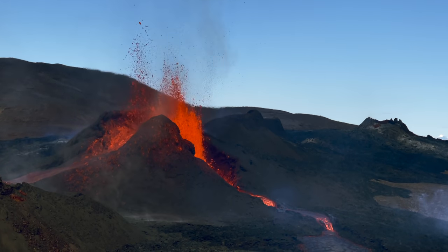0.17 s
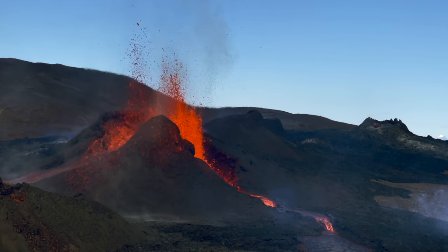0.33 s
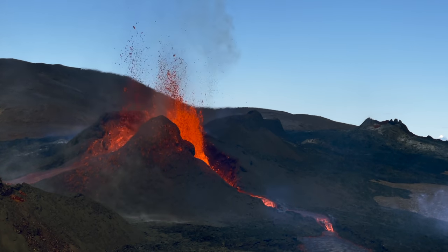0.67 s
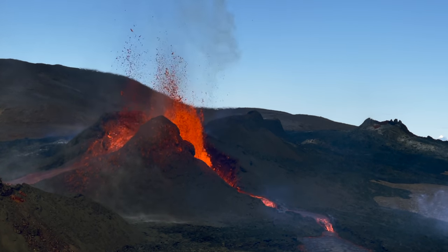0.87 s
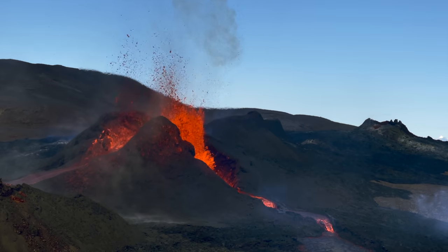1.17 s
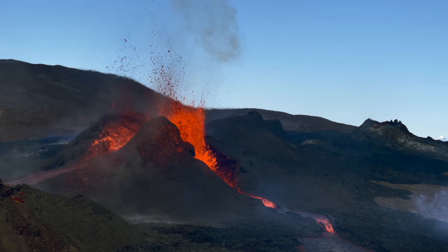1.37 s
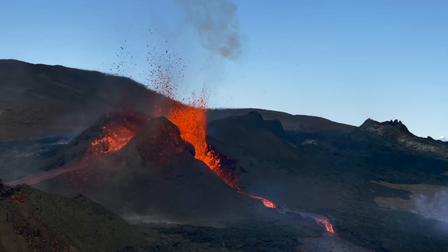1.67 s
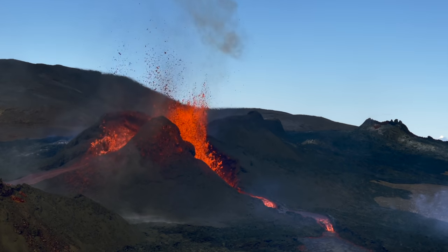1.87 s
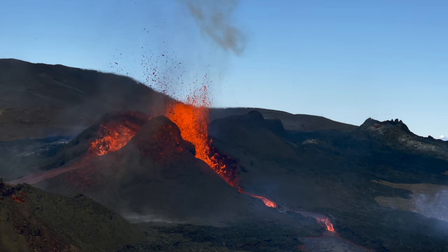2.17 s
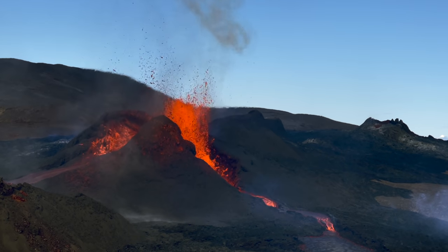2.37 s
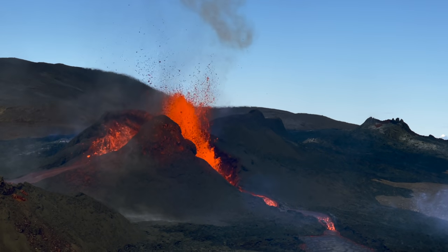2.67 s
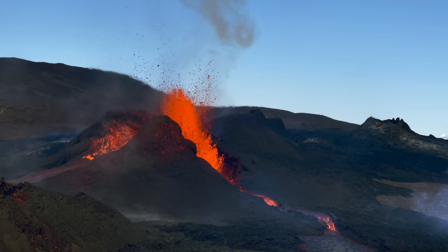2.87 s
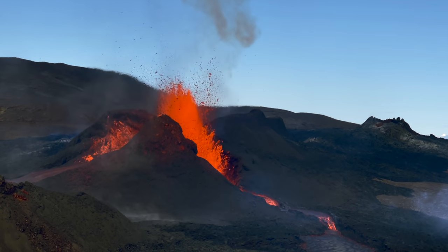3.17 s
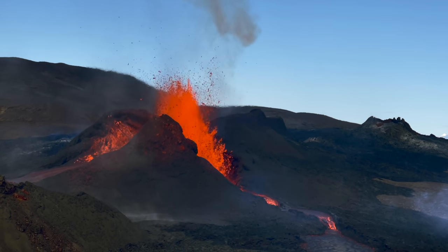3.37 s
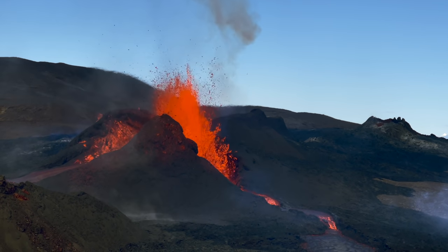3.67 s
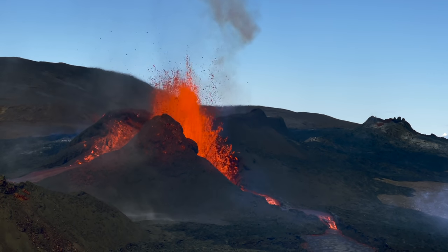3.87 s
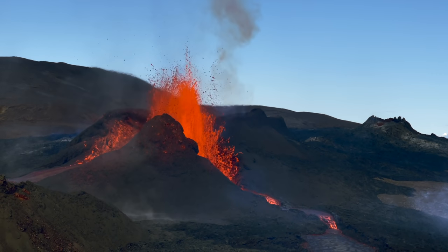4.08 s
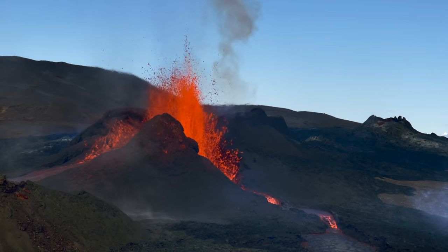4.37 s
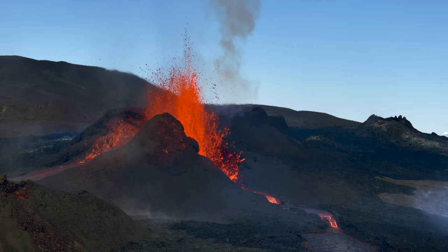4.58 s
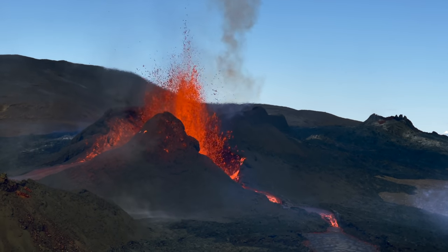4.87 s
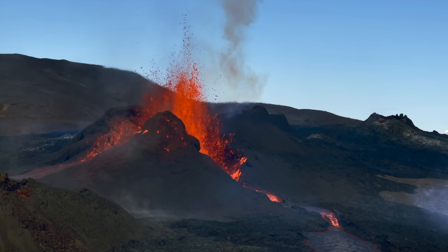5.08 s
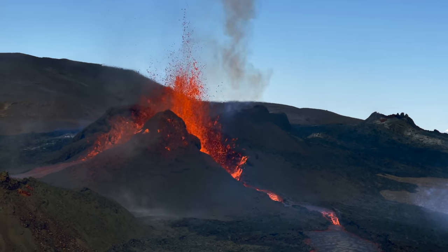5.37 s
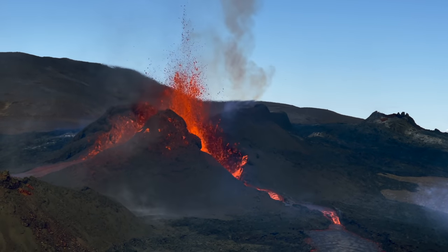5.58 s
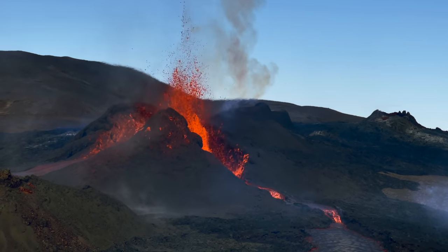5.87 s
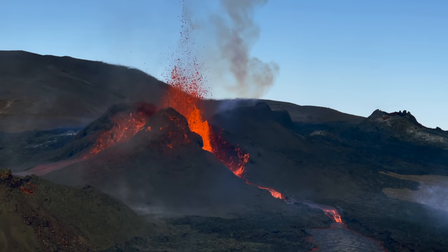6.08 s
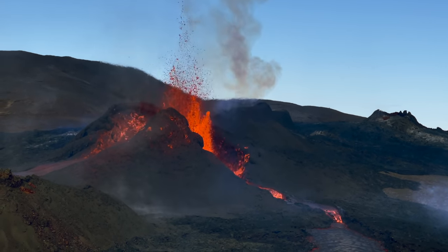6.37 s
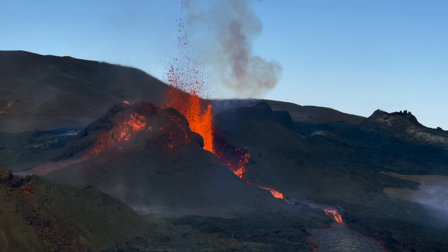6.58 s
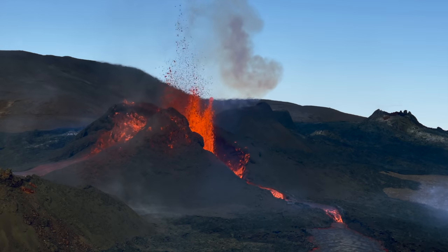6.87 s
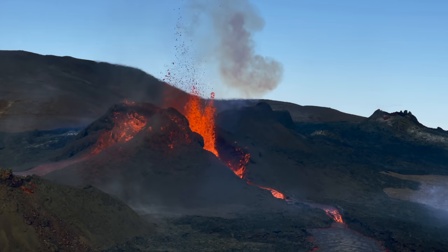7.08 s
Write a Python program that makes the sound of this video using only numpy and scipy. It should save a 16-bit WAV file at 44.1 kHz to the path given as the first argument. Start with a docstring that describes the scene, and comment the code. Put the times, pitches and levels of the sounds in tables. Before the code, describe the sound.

A lava fountain erupts from a crater, heard from far across open ground. A deep, unbroken rushing roar fills the whole stretch, with low rumble underneath and dull, dense spatter above. Brief bass surges swell and merge without separate bangs. The jet eases slightly early on, strengthens past the middle, dips and lifts again at the end. Distant stereo microphones catch little treble, a trace of low wind and faint hiss.

```python
"""One deep, steady, rushing roar: a lava fountain heard from far across open ground.
Below, the magma column heaves and gas slugs burst, as low noise and dense random pushes.
Above, a noise jet roars and spatter rains on the cone as still denser pushes; the air takes the treble.
Ground echoes colour the two microphones differently, over light air on each and a faint electronic hiss."""
import sys
import numpy as np
from scipy import signal
from scipy.fft import rfft, irfft
from scipy.io import wavfile

SR = 44100
rng = np.random.default_rng(int(sys.argv[2]) if len(sys.argv) > 2 else 0)


def transcribe(u):
    """Save the signal u as a 16-bit wav file named by the first command-line argument.

    u: samples, shape (n,) or (channels, n), limited to [-1, 1]; the rate is SR.
    q: integer samples, one column per channel.
    """
    v = np.clip(np.atleast_2d(u).T, -1, 1)
    q = np.round(v * 32767).astype(np.int16)
    wavfile.write(sys.argv[1], SR, q)


N = 318843
TIME = np.arange(N) / SR  # seconds
FREQS = np.maximum(np.fft.rfftfreq(N, 1 / SR), 1)  # Hz, kept above zero for the log axis

# Colour of the whole eruption at this distance. Each row: frequency in Hz, level in dB per Hz.
ERUPTION_COLOUR = [(7.1, -36.5), (12, -9.5), (59, 1.5), (85, 0), (139, -1.5), (232, -11.5), (662, -13),
                   (836, -16), (1030, -16.5), (1640, -27.5), (2230, -39.5), (3160, -56.5), (4110, -71),
                   (6950, -120)]


def undb(db):
    """Decibels to gain."""
    return 10 ** (np.asarray(db) / 20)


def unit(x):
    """Scale to rms 1."""
    return x / np.sqrt(np.mean(x ** 2))


def noise():
    """White noise as long as the scene."""
    return rng.standard_normal(N)


def over_frequency(table):
    """The columns of a spectrum table at every frequency, joined on a log axis."""
    points, *columns = np.transpose(table)
    return [np.interp(np.log(FREQS), np.log(points), column) for column in columns]


def colour(x, table, lo_hz, hi_hz):
    """Give x the spectrum of a table between two soft band edges; rms 1."""
    db, = over_frequency(table)
    low_skirt = 1 + (lo_hz / FREQS) ** 10
    high_skirt = 1 + (FREQS / hi_hz) ** 10
    skirts = 1 / np.sqrt(low_skirt * high_skirt)
    return unit(irfft(rfft(x) * undb(db) * skirts, N))


def walk(rate_hz):
    """Smooth random drift, its spectrum fading out around rate_hz; rms 1."""
    return unit(irfft(rfft(noise()) * np.exp(-(FREQS / rate_hz) ** 2), N))


def impacts(per_s, scatter_db):
    """Pushes at random moments, each with its own sign and a size scattered in dB; rms 1."""
    happens = rng.random(N) < per_s / SR
    sign = np.sign(noise())
    size = undb(scatter_db * noise())
    return unit(happens * sign * size)


def slug_lift():
    """Each large slug swells quickly, holds and dies away: the dB it adds to the heaving and the bursting."""
    # Large gas slugs that break through. Each row: start in seconds, length in seconds,
    # lift of the heaving in dB, lift of the bursting in dB.
    slugs = [(0.0, .34, 6.5, 4.5), (0.491, .06, 6, 1.5), (0.94, .1, 0, 2.5), (2.15, .55, 0.5, 1.6),
             (3.24, .06, 3.5, 1), (3.52, 0.14, 5, 2.5), (3.8, .22, 1.5, 2.2), (4.581, .2, 1, 4.5),
             (4.919, .06, 3, 3), (5.379, .25, 2, 2.5), (5.807, .12, 1.5, 4.5), (6.189, .12, 3, 3.5),
             (6.521, .08, 3.5, 0.5), (6.989, 0.11, 3, 3.5)]
    attack_s, release_s = 0.043, 0.075
    lift_db = np.zeros((2, N))
    for start, length, heave_db, burst_db in slugs:
        attack = np.clip((TIME - start) / attack_s, 0, 1)
        release = np.exp(-np.maximum(TIME - start - length, 0) / release_s)
        lift_db += np.outer([heave_db, burst_db], attack * release)
    return lift_db


def vent_levels():
    """Heaving and bursting in dB: a steady build as pressure rises in the vent, lifted by each slug."""
    heave_lift, burst_lift = slug_lift()
    heave_db = -31.5 + 0.59 * TIME + heave_lift  # slopes in dB per second
    burst_db = -27 + 0.47 * TIME + burst_lift
    return heave_db, burst_db


def vent(heave_db, burst_db):
    """The magma column heaves below; gas slugs burst so densely that their thumps merge into a rumble."""
    heave = colour(noise(), ERUPTION_COLOUR, lo_hz=9.8, hi_hz=71)
    bursts = colour(impacts(per_s=1500, scatter_db=0.0), ERUPTION_COLOUR, lo_hz=71.0, hi_hz=201)
    return heave * undb(heave_db) + bursts * undb(burst_db)


def fountain_levels():
    """Jet and spatter levels in dB: the fountain's slow rise and fall, lifted briefly by each spurt."""
    # Strength of the fountain above the vent. Each row: time in seconds, gas jet in dB, spatter in dB.
    strength = [(0.0, -26.5, -32), (0.6, -27, -33.5), (1.001, -28, -32.5), (1.7, -28, -34), (3.3, -28, -33),
                (3.6, -26.8, -30), (4.1, -26, -30.5), (4.75, -25, -31), (6.15, -27, -33.5),
                (6.8, -26.5, -33.5), (7.0, -24.6, -32), (7.23, -25.5, -32)]
    # Short spurts. Each row: peak time in seconds, lift of both jet and spatter in dB.
    spurts = [(3.93, 2), (4.16, 3), (5.28, 1.4), (6.55, 3)]
    spurt_width_s = 0.042  # from the peak to 1/e of the lift
    times, jet_db, spatter_db = np.transpose(strength)
    lift_db = sum(db * np.exp(-((TIME - peak) / spurt_width_s) ** 2) for peak, db in spurts)
    return np.interp(TIME, times, jet_db) + lift_db, np.interp(TIME, times, spatter_db) + lift_db


def jet(db):
    """Turbulent gas leaves the vent; its eddies make the roar flutter a little."""
    flutter_db = 0.47 * walk(rate_hz=8.6)
    return colour(noise(), ERUPTION_COLOUR, lo_hz=200, hi_hz=750) * undb(db + flutter_db)


def spatter(db):
    """Countless clots tear off and splash on the cone; finer spray rushes above them."""
    clots = colour(impacts(per_s=12000, scatter_db=2.5), ERUPTION_COLOUR, lo_hz=730, hi_hz=1750)
    spray = colour(impacts(per_s=16000, scatter_db=2.0), ERUPTION_COLOUR, lo_hz=1705, hi_hz=6000)
    # the spray follows a share of the spatter's swing and slowly thins out
    swing_share, thinning_db_per_s = 0.58, -0.5657
    spray_db = -42.5 + swing_share * (db - db.mean()) + thinning_db_per_s * TIME
    flutter_db = 0.4 * walk(rate_hz=14)
    return (clots * undb(db) + spray * undb(spray_db)) * undb(flutter_db)


def microphones(x, scattered_db):
    """Ground echoes ripple level and phase between the ports; the far slopes add a little unrelated sound."""
    # Ground echoes at the two microphones. Each row: frequency in Hz, left minus right in dB,
    # left's lead in radians.
    echoes = [(80, 0.5, 0.04), (140, 2.5, -0.14), (225, -1.1, 0.06), (275, 6, -0.2), (340, 0.7, -0.6),
              (450, -2.5, -0.79), (530, -8.5, 0.029), (600, -2.5, 0.55), (770, 3, -0.06), (860, 0, -0.35),
              (1130, -4, -0.09), (1220, -2.5, 0.05), (1500, -0.5, -0.02), (3000, -1, -0.01)]
    pan_db, lead = over_frequency(echoes)
    half = undb(pan_db / 2) * np.exp(1j * lead / 2)
    # the mean of both ports keeps its level at every frequency
    ports = np.array([half, 1 / half]) / np.abs((half + 1 / half) / 2)
    spectrum = rfft(x)
    # long waves, well below this frequency, scatter little
    apart_hz = 190
    random_phase = np.exp(2j * np.pi * rng.random(len(FREQS)))
    scattered = spectrum * random_phase * FREQS / np.hypot(FREQS, apart_hz)
    opposite = np.array([[1], [-1]])
    return irfft(spectrum * ports + undb(scattered_db) * scattered * opposite, N)


def breeze(db):
    """Light air on each port makes its own very low rumble; both swell and fade together."""
    puffs = np.array([colour(noise(), ERUPTION_COLOUR, lo_hz=8, hi_hz=24) for _ in range(2)])
    return puffs * undb(db + 2 * walk(rate_hz=1.5))


def electronics(hiss_db, whine_db):
    """Each channel hisses on its own; a very faint steady sine whine is common to both."""
    # Microphone self-noise. Each row: frequency in Hz, level in dB per Hz.
    hiss_colour = [(1000, 0.5), (3700, 1.5), (5000, 0.5), (8000, -0.5), (15000, -1.5)]
    whine_hz = 7759
    hiss = np.array([colour(noise(), hiss_colour, lo_hz=500, hi_hz=20000) for _ in range(2)])
    whine = np.sin(2 * np.pi * whine_hz * TIME)
    return undb(hiss_db) * hiss + undb(whine_db) * whine


def scene():
    """Vent, jet and spatter sound from one far spot; the two microphones hear it through a breeze."""
    heave_db, burst_db = vent_levels()
    jet_db, spatter_db = fountain_levels()
    fountain = vent(heave_db, burst_db) + jet(jet_db) + spatter(spatter_db)
    return microphones(fountain, scattered_db=-22.5) + breeze(db=-44.5)


def record(dry):
    """The recorder adds its own noise and cuts the top steeply."""
    top_hz = 15700
    top_cut = signal.ellip(10, .1, 80, top_hz, fs=SR, output="sos")
    return signal.sosfilt(top_cut, dry + electronics(hiss_db=-69, whine_db=-90.5))


dry = scene()
out = record(dry)
transcribe(out)
```